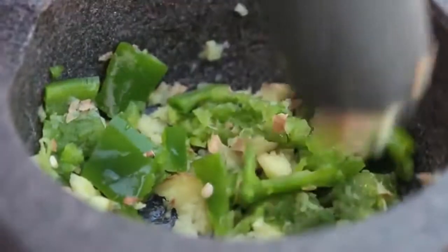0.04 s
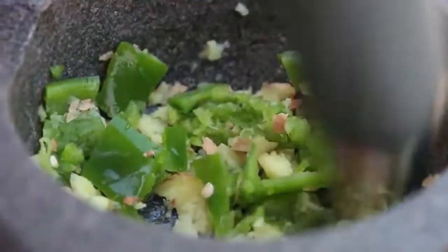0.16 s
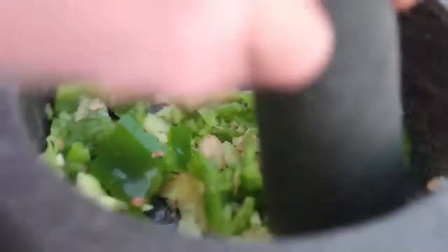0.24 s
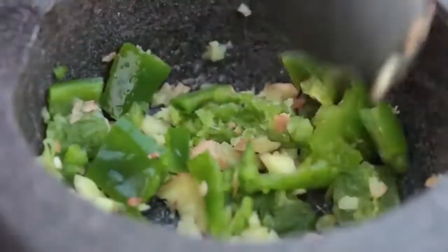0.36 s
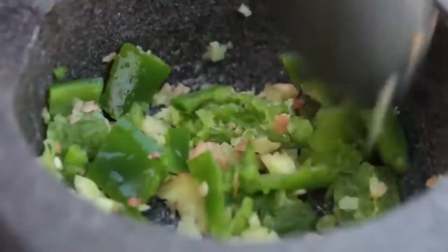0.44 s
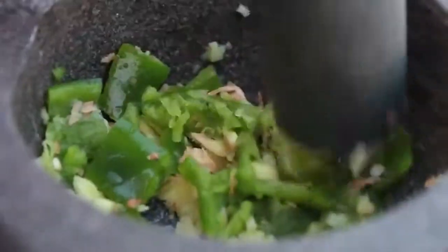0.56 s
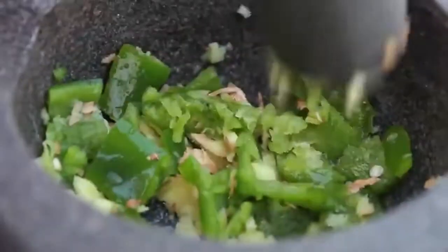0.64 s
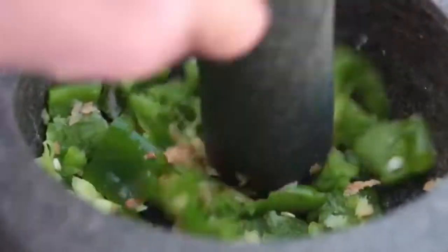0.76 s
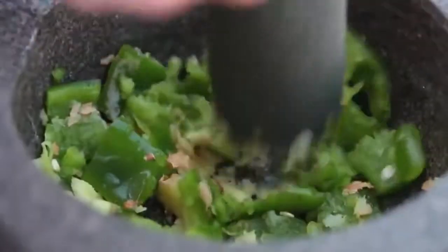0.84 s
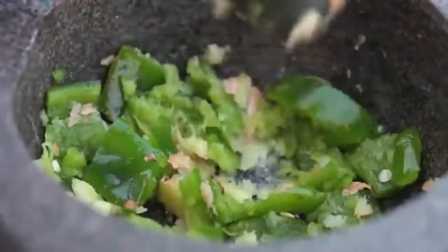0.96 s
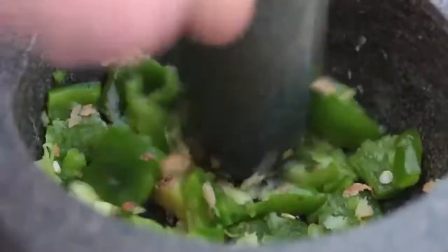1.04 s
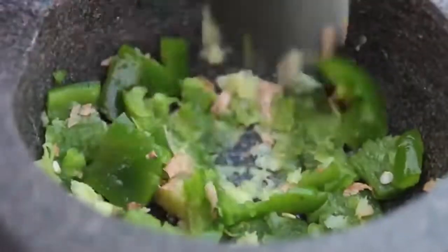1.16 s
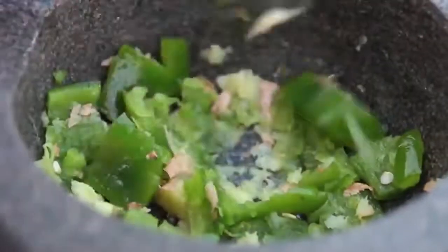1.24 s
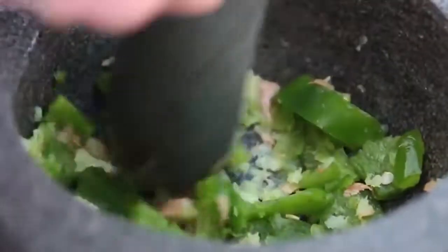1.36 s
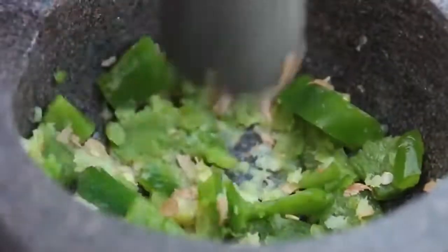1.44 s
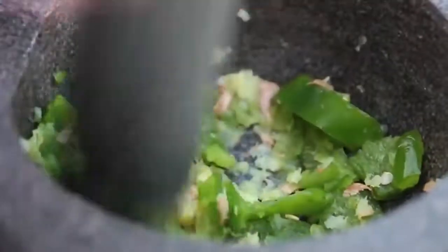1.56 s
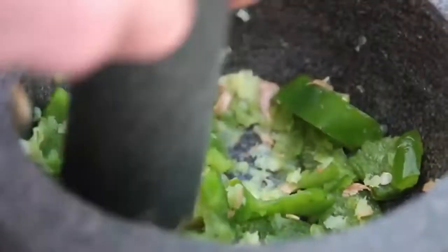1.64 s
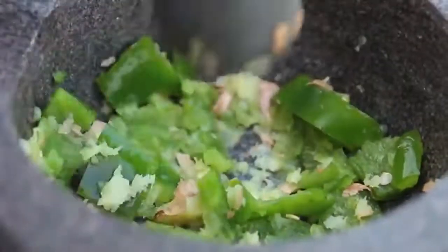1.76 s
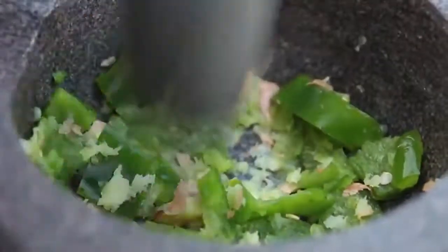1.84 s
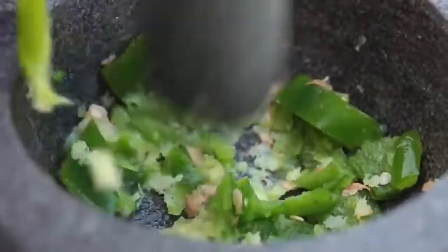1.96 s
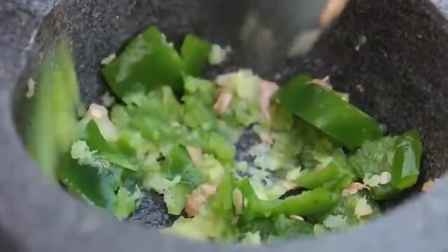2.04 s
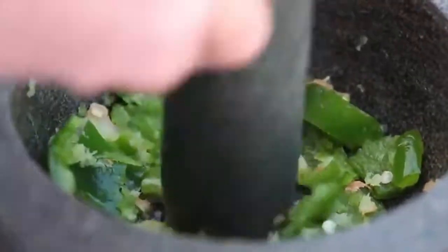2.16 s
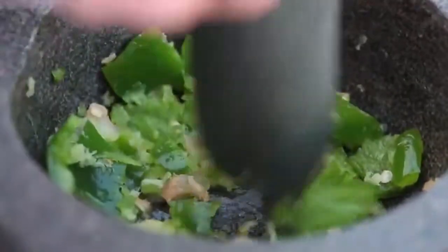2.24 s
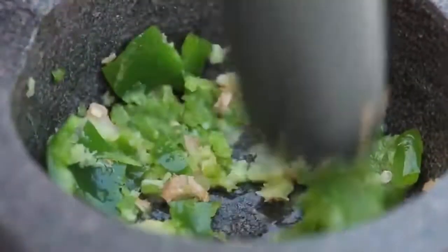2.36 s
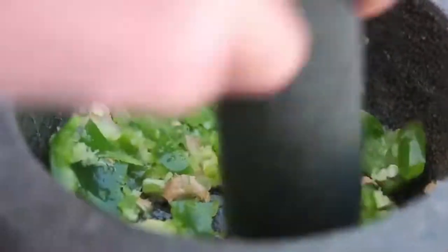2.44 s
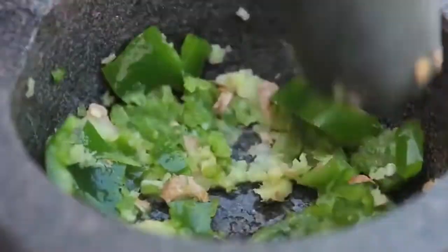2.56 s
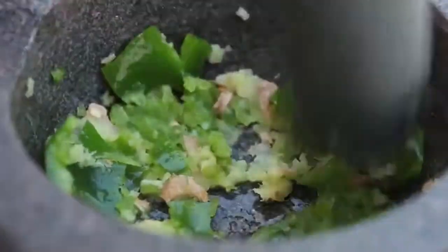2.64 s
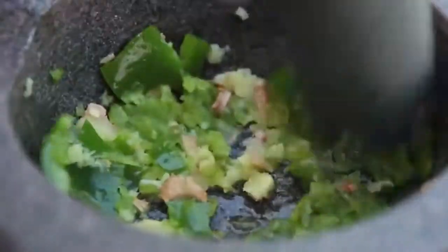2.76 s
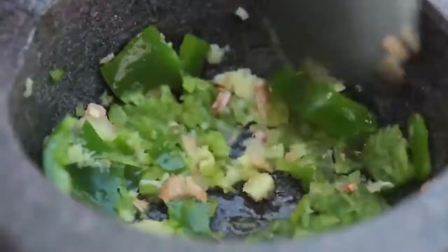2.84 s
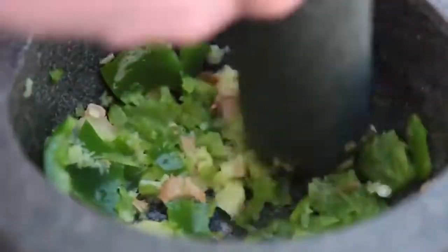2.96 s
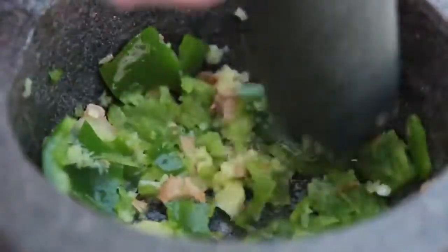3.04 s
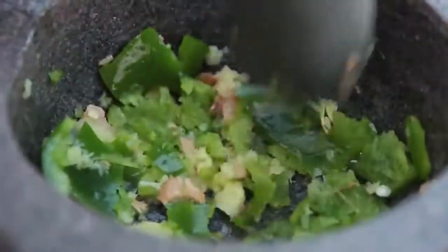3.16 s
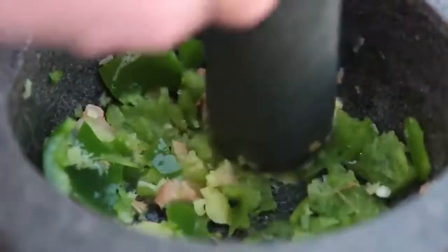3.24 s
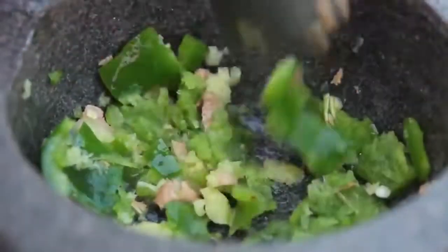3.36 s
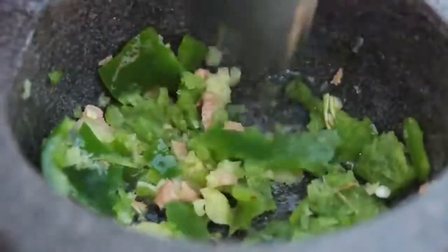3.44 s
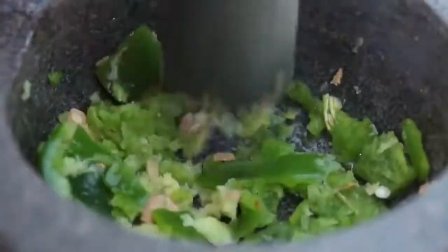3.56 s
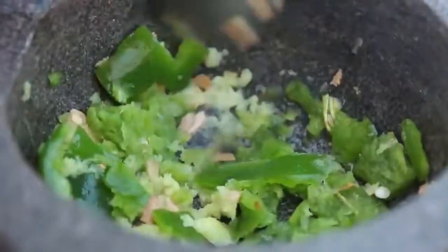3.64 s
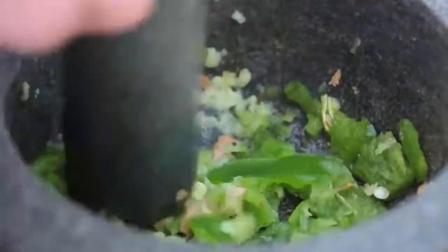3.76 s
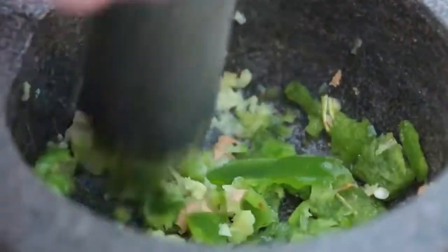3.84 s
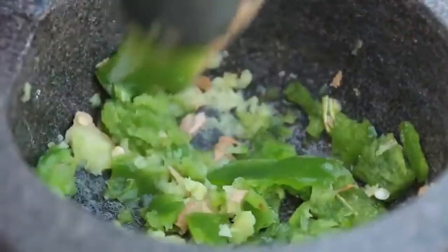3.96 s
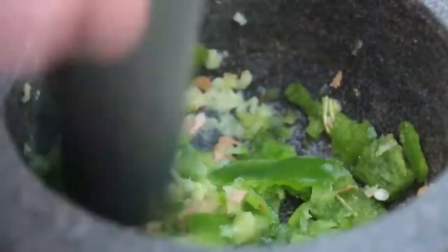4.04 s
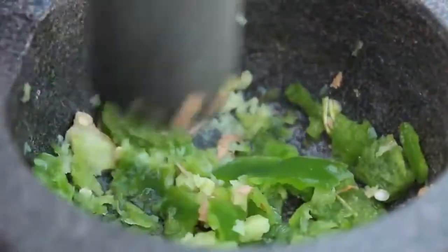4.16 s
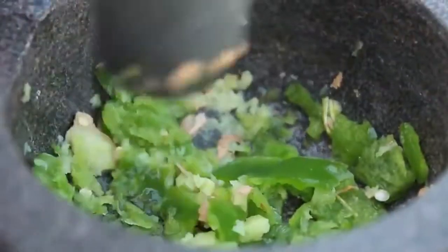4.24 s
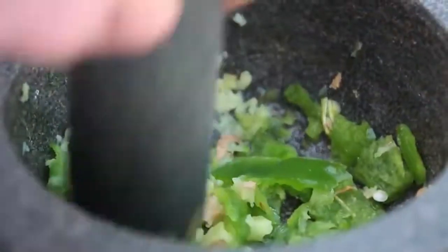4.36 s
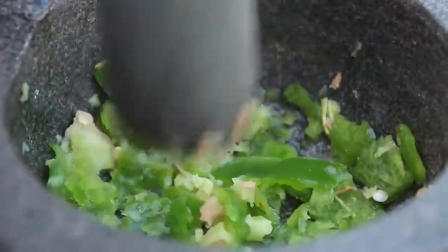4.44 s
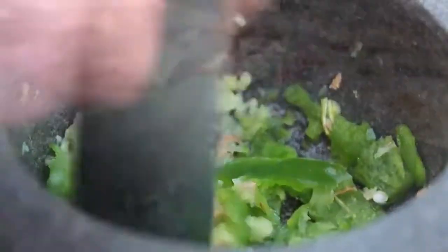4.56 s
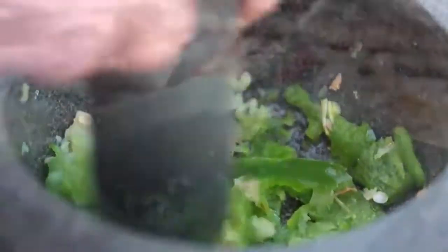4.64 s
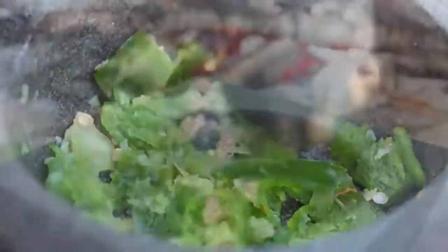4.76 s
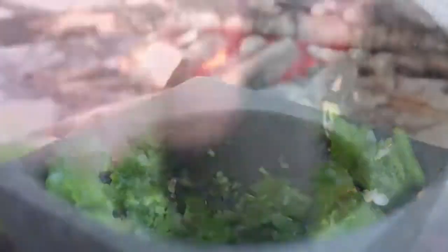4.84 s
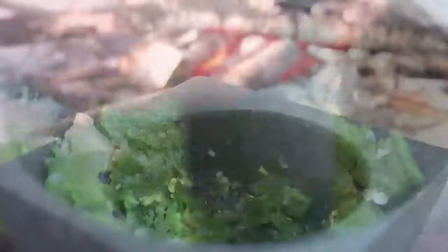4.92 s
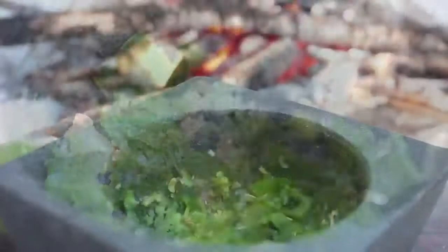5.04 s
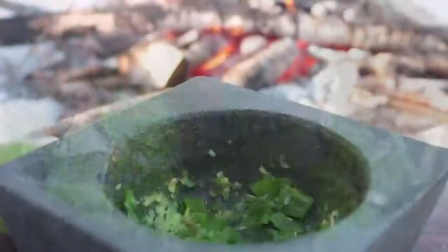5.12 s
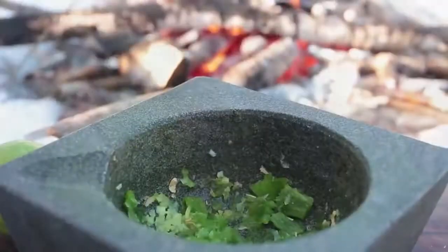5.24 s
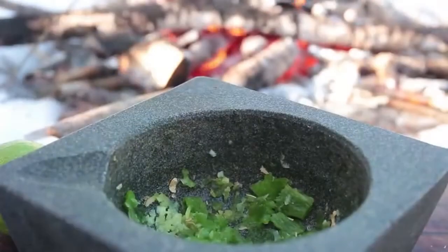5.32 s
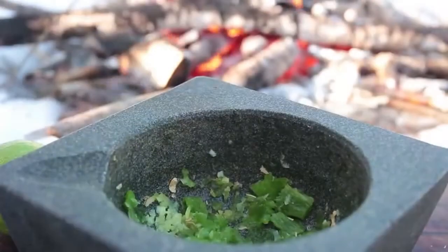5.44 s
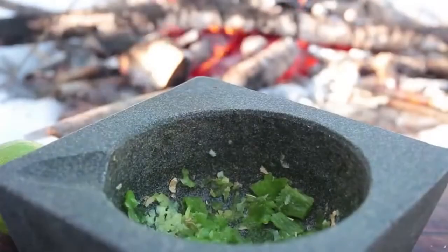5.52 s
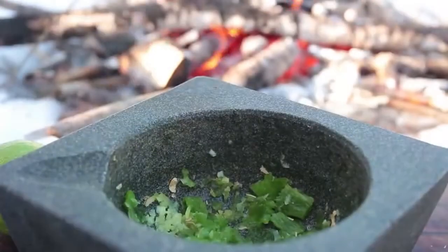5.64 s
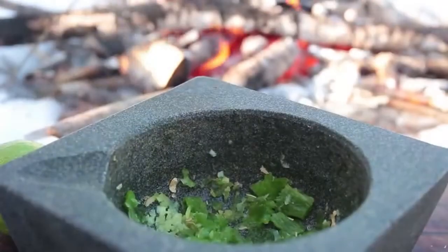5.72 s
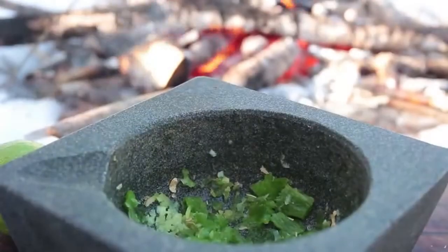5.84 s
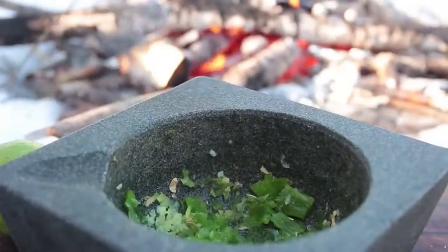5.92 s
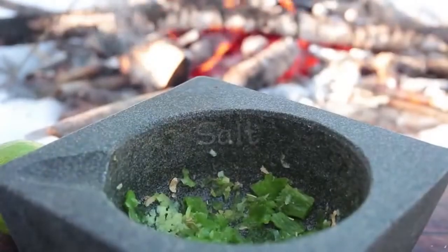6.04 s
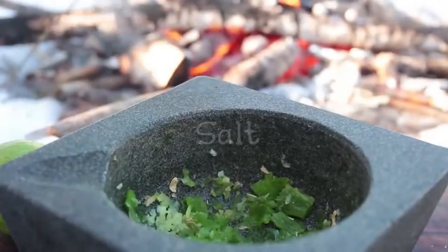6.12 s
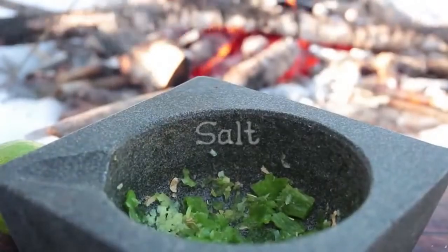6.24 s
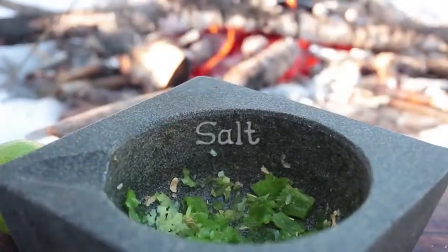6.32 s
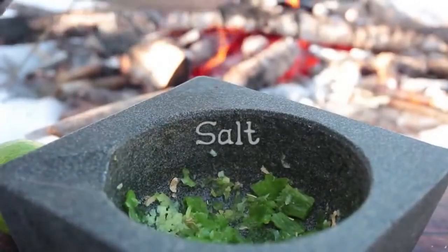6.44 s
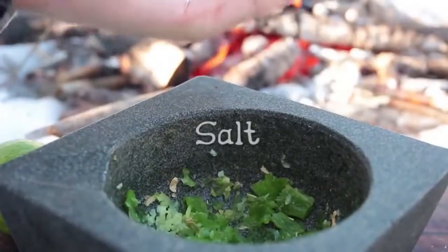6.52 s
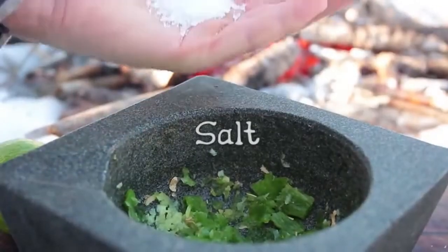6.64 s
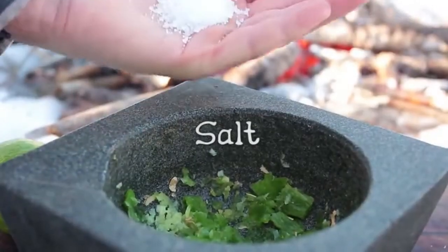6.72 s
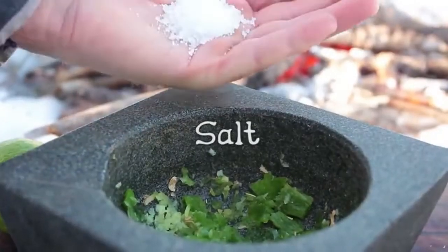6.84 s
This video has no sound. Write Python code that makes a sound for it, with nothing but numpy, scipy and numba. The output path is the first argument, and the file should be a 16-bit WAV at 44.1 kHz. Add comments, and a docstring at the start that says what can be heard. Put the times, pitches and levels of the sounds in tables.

```python
"""A stone pestle pounds chillies in a stone mortar on a board: filtered bursts of noise grains crush wet pulp.
Each landing and each rock of the mortar excites the board's decaying modes; bare stone cracks and rings.
Outdoors beside a fire: noise bands make its hush, short noise ticks its pops, a late scatter the far echo.
The last strokes weaken into the hush. The small camera's gain control ducks the sound after loud strokes."""
import sys
import numpy as np
from scipy import signal
from scipy.fft import rfft, irfft, next_fast_len
from scipy.io import wavfile
from scipy.ndimage import uniform_filter1d
from numba import njit

SR = 44100
rng = np.random.default_rng(int(sys.argv[2]) if len(sys.argv) > 2 else 0)


def generate_wav(sig):
    """Save sig (samples, or channels by samples) to the path in sys.argv[1] as 16-bit PCM at SR."""
    pcm = np.round(np.clip(np.atleast_2d(sig).T, -1, 1) * 32767).astype(np.int16)
    wavfile.write(sys.argv[1], SR, pcm)


N = 303836


def undb(db):
    """Level to amplitude: 20 dB is a factor of ten."""
    return 10 ** (np.asarray(db) / 20)


def on_log(hz, table):
    """Spectral interpolation: straight lines over the logarithm of frequency."""
    table_hz, values = np.transpose(table)
    return np.interp(np.log(hz), np.log(table_hz), values)


def band(x, hz, width_hz):
    """Two-pole resonance of unit gain at its centre."""
    b, a = signal.iirpeak(min(hz, 0.4 * SR), hz / width_hz, fs=SR)
    return signal.lfilter(b, a, x)


def peak_one(x):
    """Normalisation to unit peak."""
    return x / np.abs(x).max()


def add(out, x, s):
    """Superposition: a sound is summed in, starting at s seconds."""
    i = max(int(s * SR), 0)
    out[i:i + len(x)] += x[:len(out) - i]


def ring(modes, gains, t):
    """Modal synthesis: an impact at t = 0 excites exponentially decaying sines."""
    hz, db, t60 = np.transpose(modes)[:, :, None]
    envelope = gains[:, None] * undb(db - 60 * t / t60)
    return (envelope * np.sin(2 * np.pi * hz * t)).sum(axis=0)


def walk(rate):
    """Slow random modulation: levels held for 1 / rate s, then smoothed twice."""
    hold = int(SR / rate)
    steps = np.repeat(rng.standard_normal(N // hold + 1), hold)
    smooth = uniform_filter1d(uniform_filter1d(steps, hold), hold)
    return 1.3 * smooth[:N]  # restores a spread near 1


@njit
def loudness(x, attack, release):
    """Envelope following: a one-pole smoother with separate rising and falling rates."""
    y, e = np.empty(len(x)), 0.
    for i in range(len(x)):
        e += (x[i] - e) * (attack if x[i] > e else release)
        y[i] = e
    return y


# spectrum of fire and open air: f/Hz, relative spectral density level/dB
HUSH_SPECTRUM = [(15, -30.5), (25, -21), (70, 0), (138, 2.5), (368, -9), (669, -9), (952, -12.5),
                 (1780, -15.5), (10400, -30.5), (14800, -37.5), (16500, -55.5)]
# course of the hush: t/s, level/dB, tilt about 1 kHz/(dB per octave)
HUSH_COURSE = [(0, -43, 0), (2.5, -44, 0.5), (4.7, -44, 0), (5.302, -44, 0.5), (5.8, -45, 0.5),
               (6.4, -45, 0.5), (6.53, -44.5, 0.5), (6.6, -43, 1.5), (6.72, -44.5, 0.5), (6.9, -45, 0.5)]
# left-right likeness of the hush: f/Hz, likeness/1 (limited to 0-1 in use)
HUSH_LIKENESS = [(60, 0.8), (130, 1), (290, 0.83), (640, 0.75), (1410, 0.48), (3100, 0.31), (6820, 0.01),
                 (15000, -0.17)]


def hush():
    """Partly coherent noise: octave bands swell together and flicker alone; the bass is most alike left and right."""
    s, db, tilt_db = np.transpose(HUSH_COURSE)
    t = np.arange(N) / SR
    db, tilt_db = np.interp(t, s, db), np.interp(t, s, tilt_db)
    size = next_fast_len(N)
    f = np.fft.rfftfreq(size, 1 / SR) + 1
    noise = rfft(rng.standard_normal((2, size))) * undb(on_log(f, HUSH_SPECTRUM))
    like = np.clip(on_log(f, HUSH_LIKENESS), 0, 1)
    mid, side = noise[0] * np.sqrt(1 + like), noise[1] * np.sqrt(1 - like)
    pair = np.array([mid + side, mid - side])
    pair = pair / irfft(pair, size).std()
    out, swell = 0, walk(2.32)
    for octave in np.arange(-6, 5, 1.):  # relative to 1 kHz
        distance = np.clip(np.log2(f / 1000) - octave, -1, 1)
        share = np.cos(np.pi / 2 * distance) ** 2  # neighbouring bands cross-fade
        flicker_db = 0.7 * swell + 1.3 * walk(12)
        out = out + undb(flicker_db + octave * tilt_db) * irfft(pair * share, size)[:, :N]
    return undb(db) * out


# pops of the fire and ticks of pulp, then from 6.565 s a brief rustle of ticks: t/s, level/dB, centre f/Hz
DISTINCT_POPS = [(1.4634, -29, 3500), (1.7643, -32, 3670), (2.0208, -26, 3270), (2.705, -33.5, 3620),
                 (2.9083, -18, 7040), (2.9378, -18.5, 9740), (3.8894, -13, 4110), (3.9394, -37, 4120),
                 (4.2173, -34, 5200), (5.013, -33.5, 4120), (5.151, -40, 5360), (5.3157, -20.5, 2960),
                 (5.59, -29.5, 7700), (5.6304, -32, 8250), (5.905, -40, 4700), (6.0222, -37.5, 5660),
                 (6.428, -34, 9080), (6.565, -32.5, 4500), (6.604, -34, 2600), (6.617, -38, 3000),
                 (6.635, -44, 3300), (6.653, -38, 2400), (6.706, -38, 2600)]


def pops(decay_ms=1.5, faint_rate=25, faint_db=-62):
    """Impulsive noise: band-passed decaying ticks, each with its own balance; faint ones form a Poisson process."""
    count = rng.poisson(faint_rate * N / SR)  # faint_rate is in ticks per second
    draw = rng.random((count, 3))
    faint_s = draw[:, 0] * N / SR
    faint_level_db = faint_db + 20 * draw[:, 1] ** 3
    faint_hz = 2500 * 4 ** draw[:, 2]
    faint = np.c_[faint_s, faint_level_db, faint_hz]
    out, ms = np.zeros((2, N)), np.arange(2048) / SR * 1000
    for s, db, hz in np.r_[DISTINCT_POPS, faint]:
        noise = rng.standard_normal(len(ms)) * np.exp(-ms / decay_ms)
        tick = peak_one(band(noise, hz, 0.42 * hz))
        side_db = 2.5 * rng.standard_normal()
        add(out[0], undb(db + side_db) * tick, s)
        add(out[1], undb(db - side_db) * tick, s)
    return out


def echo(work, delay_s=0.095, swell_s=0.024, level_db=-30, centre_hz=2800):
    """Diffuse reflection: far trees or a wall return strokes late, smeared and thin, scattered apart per port."""
    t = np.arange(8192) / SR
    scatter = rng.standard_normal((2, len(t))) * t * np.exp(-t / swell_s)
    scatter = band(scatter / np.linalg.norm(scatter[0]), centre_hz, 2600)
    late = np.r_[np.zeros(int(delay_s * SR)), work][:N]
    return undb(level_db) * signal.fftconvolve(late[None], scatter)[:, :N]


# pestle on bare stone: t/s, level/dB, crack f/Hz, low ring level/dB, high ring level/dB (rings re the hit)
STONE_HITS = [(0.3298, 7, 1960, -14, -27), (0.8866, 14, 1180, -31.5, -53), (1.1675, 17.5, 1208, -29, -67),
              (3.8793, 0, 1470, -7, -21), (4.431, 7.5, 1976, -13.5, -23.5), (4.709, 8, 924, -58, -52),
              (5.2454, 1.5, 1070, -26, -47)]
# modes of the stone mortar: f/Hz, level/dB, decay time t60/s
STONE_MODES = [(2788, -5, 0.083), (2678, -14.5, 0.085), (4117, 5, 0.094), (4180, -15.5, 0.11),
               (5350, -1.5, 0.012), (7080, -14, 0.016), (8340, -25, 0.0067)]


def clacks(sides, crack_t60=0.0056):
    """Modal impact: a crack of a few cycles, then the mortar's ring; sides weighs each mode of each hit."""
    out, t = np.zeros(N), np.arange(16384) / SR
    low = np.array(STONE_MODES)[:, 0] < 3500
    for (s, db, hz, low_db, high_db), side in zip(STONE_HITS, sides):
        crack_modes = [(hz, 0, crack_t60), (1.438 * hz, -5, crack_t60), (2.436 * hz, -12, 0.005)]
        crack = ring(crack_modes, -side[:3], t)
        ring_gains = side[3:] * undb(np.where(low, low_db, high_db))
        add(out, undb(db) * (crack + ring(STONE_MODES, ring_gains, t)), s)
    return out


EDGE_LAG_S = 0.014  # first edge of the base to second
PRESSED_S, FREE_S = 0.031, 0.045  # the board is stilled sooner under the pestle than under the rocking mortar
ROCK_CHATTER_MS, SECOND_KNOCK_DB = 3.16, -3.5  # second edge's knock setting relative to its thump setting
# pestle drives the mortar into the board: t/s, first touch level/dB, full weight level/dB, weight lag t/ms,
# deep modes level/dB, knock level/dB, strongest knock f/Hz, chatter t/ms
PESTLE_LANDINGS = [(0.0213, -0.5, -20, 6.5, -20, 3, 720, 5.1), (0.332, -14, -41, 5.2, -30, -6, 1100, 18),
                   (0.6034, -13.5, -18.5, 10.6, -1.5, -3, 1150, 4.5),
                   (0.8882, -9.5, -8, 3.23, 5, 3, 1100, 6), (1.1682, -6.5, -2, 5.83, 4.5, 6, 1100, 7.7),
                   (1.444, -18.5, -6.5, 6.5, 4.5, 0.5, 900, 24), (1.723, -7, -11, 3.3, 6.5, 0.5, 620, 6.9),
                   (1.9993, -4, -6, 7.6, -7, 6, 820, 8.1), (2.277, -6, -5, 6.07, 3.5, -2, 1100, 10.5),
                   (2.545, -9, -9.5, 6, 3, 3, 1000, 4.7), (2.793, -11, -12.5, 10, -0.5, -1, 1000, 7.6),
                   (3.071, -15.5, -34, 4.4, -18, -9.5, 1150, 4.8), (3.342, -9, -40, 4, -9, 2.5, 1150, 6.3),
                   (3.614, -7.5, -7.5, 5.44, 4.5, 1, 820, 6), (3.881, -11, -22, 4.5, -4.5, -8, 1100, 12),
                   (4.167, -14, -15, 9.01, 6, -23, 620, 8.8), (4.432, -14.5, -35, 5, -10, 3.5, 820, 4),
                   (4.7087, -6.5, -5, 9.4, -9, 8, 950, 5.4), (4.976, -4.5, -39, 6, -27.5, -4.5, 1100, 5),
                   (5.247, -23.5, -29.5, 11.6, -42, -1, 1000, 4.4),
                   (5.51, -20.5, -36, 5.4, -11.5, -15.5, 720, 4)]
# the mortar rocks, one edge of its base comes down and then the other; the last row is a lone faint late knock:
# # t/s, first edge level/dB, second edge level/dB, first knock level/dB, strongest knock f/Hz
MORTAR_ROCKS = [(0.038, -2, -12, 7.5, 1170), (0.0813, -6, -20, -2.5, 830), (0.125, -11.5, -23, -8.5, 593),
                (0.148, -19, -18, -27, 590), (0.3512, -7, -10.5, 0, 700), (0.389, -8, -15, -5.5, 790),
                (0.428, -13, -15.5, -12.5, 585), (0.4766, -21.5, -36, -20.5, 590),
                (0.6327, -12, -38, -10, 1150), (0.6673, -7, -20, 3.5, 810),
                (0.7142, -13, -15.5, -13.5, 600), (0.752, -23, -43, -23, 600), (0.924, -9.5, -18, -7, 590),
                (0.955, -21, -49, -22, 600), (1.203, -19.5, -34, -19, 815), (1.483, -6.5, -39, -3.5, 1170),
                (1.75, -15, -31, -20, 600), (1.776, -22.5, -35, -23, 670), (2.031, -14, -39, -12, 790),
                (2.317, -7.5, -14.5, -2.5, 970), (2.58, -8, -6.5, -2.5, 590), (2.627, -9, -26, -3.5, 594),
                (2.65, -14.5, -40, -24, 600), (2.814, -13.5, -37, -23, 600), (2.828, -12, -25, -10, 590),
                (2.844, -6, -7.5, 3, 750), (2.886, -8, -18, -7.5, 587), (2.93, -22, -51, -27, 600),
                (3.098, -9.5, -27, -10, 607), (3.142, -23.5, -38, -26.5, 606),
                (3.362, -12.5, -41, -11, 980), (3.3778, -6.5, -21, -3, 624), (3.632, -22, -42, -12, 980),
                (3.649, -13, -36, -7, 1180), (3.9, -11, -14, -4, 804), (3.92, -13.5, -28, -14.5, 590),
                (4.189, -14, -35, -8, 646), (4.204, -24, -44, -20.5, 820), (4.451, -11.5, -28, -11, 620),
                (4.471, -13, -40, -19, 800), (4.491, -24.5, -33, -16, 644), (4.73, -19, -38, -14, 740),
                (5.025, -14.5, -26, -15, 810), (5.053, -20.5, -25, -10, 604),
                (5.313, -41, -48, -23.5, 1200), (5.545, -31.5, -35, -25.5, 590), (5.57, -32, -42, -37, 800),
                (5.598, -44, -52, -29, 590), (6.359, -46, -60, -25, 603)]


def blows():
    """Paired impacts: touch then weight for a landing, edge then edge for a rock, as one row per blow."""
    # t/s, thump level/dB, stilling t/s, deep level/dB, knock level/dB, knock f/Hz, chatter t/ms
    rows, none = [], -np.inf
    for s, touch_db, weight_db, lag_ms, deep_db, knock_db, hz, chatter_ms in PESTLE_LANDINGS:
        weight_s = s + lag_ms / 1000
        rows.append((s, touch_db, PRESSED_S, none, knock_db, hz, chatter_ms))
        rows.append((weight_s, weight_db, PRESSED_S, deep_db, none, hz, chatter_ms))
    for s, first_db, second_db, knock_db, hz in MORTAR_ROCKS:
        second_knock_db = second_db + SECOND_KNOCK_DB
        rows.append((s, first_db, FREE_S, none, knock_db, hz, ROCK_CHATTER_MS))
        rows.append((s + EDGE_LAG_S, second_db, FREE_S, none, second_knock_db, hz, ROCK_CHATTER_MS))
    return rows


DEEP_HZ, KNOCK_HZ = 160, 450  # modes up to the first are deep, those from the second up knock
FOCUS_DB = 24  # a knock mode's loss one octave from the strongest, growing as octaves squared
DETUNE = 0.04  # spread of the shift, as a share, that the load gives the middle modes from blow to blow
# modes of the board: f/Hz, level/dB, decay time t60/s (before stilling)
BOARD_MODES = [(144, -4, 0.028), (187.3, -12.5, 0.21), (228.9, 4, 0.1), (252.5, -3, 0.084),
               (362.3, -2.5, 0.052), (620, -11.5, 0.024), (723, -7, 0.0055), (856, -11.5, 0.018),
               (1149, 1.5, 0.0073), (1750, 0, 0.0013), (1950, -12, 0.01), (2940, 10, 0.012)]


def thuds(push_ms=0.41, grit_ms=0.14, bass_hz=90, build_s=0.001):
    """Modal excitation by contact time: a soft push rings the low board modes, gritty chatter the upper ones."""
    t, modes = np.arange(4096) / SR, np.array(BOARD_MODES)
    hz, ms = modes[:, 0], t[:1024] * 1000
    push = ms * np.exp(-ms / push_ms)
    grit = ms * np.exp(-ms / grit_ms)
    middle, high = modes[(hz > DEEP_HZ) & (hz < KNOCK_HZ)], modes[hz >= KNOCK_HZ]
    deep = ring(modes, 1. * (hz <= DEEP_HZ), t)
    low, knocks, rows = np.zeros(N), np.zeros(N), blows()
    chances = rng.standard_normal((len(rows), len(ms)))
    for row, chance in zip(rows, chances):
        s, db, settle_s, deep_db, knock_db, knock_hz, chatter_ms = row
        # the heavy mortar sets the board swinging, then settles on it and stills it
        swing = ring(middle, np.ones(len(middle)), t * (1 + DETUNE * chance[0]))
        thump = swing * (1 - np.exp(-t / build_s)) * np.exp(-(t / settle_s) ** 2)
        add(low, undb(db) * thump + undb(deep_db) * deep, s)
        # sparse contacts of either sign, the first one certain
        contacts = np.r_[6, chance[1:] ** 3] * np.exp(-ms / max(chatter_ms, 0.1))
        contacts = contacts / np.linalg.norm(contacts)
        # the spot that is struck favours some modes
        spot = undb(-FOCUS_DB * np.log2(high[:, 0] / knock_hz) ** 2)
        knock = peak_one(signal.fftconvolve(ring(high, spot, t[:len(ms)]), grit))
        add(knocks, undb(knock_db) * signal.fftconvolve(knock, contacts), s)
    board = knocks + signal.fftconvolve(low, push / push.sum())[:N]
    # a small board cannot radiate deep bass
    return signal.sosfilt(signal.butter(2, bass_hz, "high", fs=SR, output="sos"), board)


# pulp crushed under the pestle: t/s, crisp level/dB, juicy low part level/dB, dull crunch level/dB
# (both re the crisp part), build-up t/ms, length t/ms, colour f/Hz
PULP_STROKES = [(0.0198, 1, -22, -25, 1.55, 0.67, 3500), (0.3301, -7.5, 10.5, -27, 0.34, 0.58, 4060),
                (0.5969, -5.5, -9, -18, 5.2, 2.1, 3800), (0.8844, -7.5, 2.5, -34, 1.6, 3.8, 3840),
                (1.1649, -0.5, 1, -34.5, 0.54, 3.7, 4150), (1.4406, -8.5, -8, -14, 0.84, 6.9, 3320),
                (1.7145, -6, -5, -15, 1.33, 3.8, 4970), (1.9945, -5, -13.5, -15, 1.65, 2.6, 4000),
                (2.2745, -7.5, -9.5, -18, 3, 6.8, 5830), (2.537, -12.5, -5, -20.5, 1.1, 5.3, 3770),
                (2.7881, 0.5, -7.5, -25, 0.4, 0.58, 4240), (3.0616, -7, -13.5, -15, 3.8, 2.5, 4500),
                (3.3357, -7, -4, -25, 1.5, 4.8, 6040), (3.606, -7, -1.5, -30, 0.75, 4.25, 4000),
                (3.8777, -12.5, 17, -28.5, 0.34, 0.91, 3000), (4.1663, -11.5, -11, -28, 2.7, 14.2, 4200),
                (4.4294, -22.5, 6, -2, 0.29, 17, 4100), (4.707, -1.5, -17, -34, 0.38, 1.45, 4400),
                (4.971, -10.5, -10.5, -22, 3, 5.6, 4270), (5.243, -9.5, -2.5, -28, 0.9, 4.6, 4100),
                (5.5033, -19.5, -10, -27, 0.9, 4.1, 3870)]


def squash(grain_db=3, fall_ms=1.36, tail_ms=9, tail_db=-24, broad_db=-6, ooze_ms=12):
    """Granular noise: bursting cells build up, last while the pestle sinks and die with a wet tail."""
    out, lead = np.zeros(N), 1024  # samples kept for the build-up
    ms = (np.arange(4096) - lead) / SR * 1000
    for s, db, low_db, ooze_db, rise_ms, length_ms, hz in PULP_STROKES:
        grain_levels = grain_db * rng.exponential(size=(2, len(ms)))
        grains = rng.standard_normal((2, len(ms))) * undb(grain_levels)
        after = np.maximum(ms - length_ms, 0)
        build_up = np.exp(np.minimum(ms, 0) / max(rise_ms, 0.05))
        shape = build_up * (np.exp(-after / fall_ms) + undb(tail_db) * np.exp(-after / tail_ms))
        broad = band(band(grains[0], 5700, 7000), 2800, 7500)
        crisp = band(grains[0], hz, 0.18 * hz) + undb(broad_db) * broad
        juicy = band(band(grains[1], 1700, 1400), 1700, 1400)
        burst = peak_one(shape * crisp) + undb(low_db) * peak_one(shape * juicy)
        # pulp goes on crunching dully while the pestle rests on it
        ooze = band(band(grains[1], 2600, 2800), 2600, 2800)
        burst = burst + undb(ooze_db) * peak_one((ms > 0) * np.exp(-after / ooze_ms) * ooze)
        cut = max(lead - int(s * SR), 0)  # build-up that would precede time zero
        add(out, undb(db) * burst[cut:], s - lead / SR)
    return out


PAN_DB = -1.5  # left minus right, for all but the pops
# part of the strokes that the two ports hear unlike: f/Hz, level/dB
PORT_DIFFERENCE = [(100, -61), (500, -18), (1500, -11), (2700, -7.5), (5000, -12.5), (9000, -7.5),
                   (14000, -1)]


def scene():
    """Superposition of sources; uneven radiation gives each port its own share of the treble."""
    shape = len(STONE_HITS), 3 + len(STONE_MODES)
    work = squash() + thuds() + clacks(np.ones(shape))
    # fresh grains and contacts and random mode signs, added in opposite sense at the two ports
    uneven = squash() + thuds() + clacks(rng.choice([-1., 1.], shape))
    size = next_fast_len(N)
    f = np.fft.rfftfreq(size, 1 / SR) + 1
    apart = irfft(rfft(uneven, size) * undb(on_log(f, PORT_DIFFERENCE)), size)[:N]
    pan = undb([[PAN_DB / 2], [-PAN_DB / 2]])
    strokes = work + apart * np.array([[-1], [1]])
    return (strokes + echo(work) + hush()) * pan + pops()


GAIN_TOP_DB, GAIN_SENSE_S, GAIN_RELEASE_S, GAIN_SLEW_S = -11, 0.0015, 0.09, 0.018  # threshold, time constants
TOP_HZ = 16650  # steep upper limit of the band


def record(dry, droop_hz=11000):
    """Delayed compression: gain falls too late for the attack, so peaks clip and the hush sinks after hard strokes."""
    heard = loudness(np.abs(dry).max(axis=0), 1 / GAIN_SENSE_S / SR, 1 / GAIN_RELEASE_S / SR)
    over_db = np.maximum(20 * np.log10(heard + 1e-9) - GAIN_TOP_DB, 0)
    cut_db = loudness(over_db, 1 / GAIN_SLEW_S / SR, 1 / GAIN_SLEW_S / SR)
    clipped = np.clip(dry * undb(-cut_db), -1, 1)
    soft = signal.sosfilt(signal.butter(1, droop_hz, fs=SR, output="sos"), clipped)
    return signal.sosfilt(signal.ellip(10, 0.2, 80, TOP_HZ, fs=SR, output="sos"), soft)


dry = scene()
out = record(dry)
generate_wav(out)
```